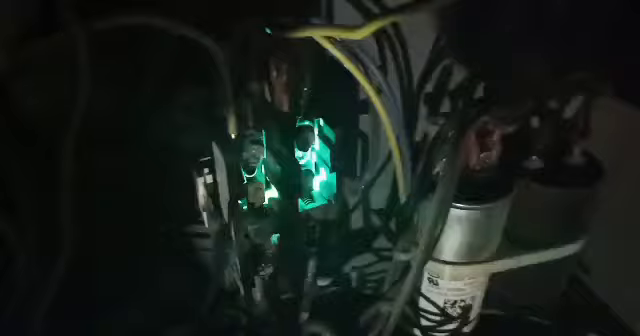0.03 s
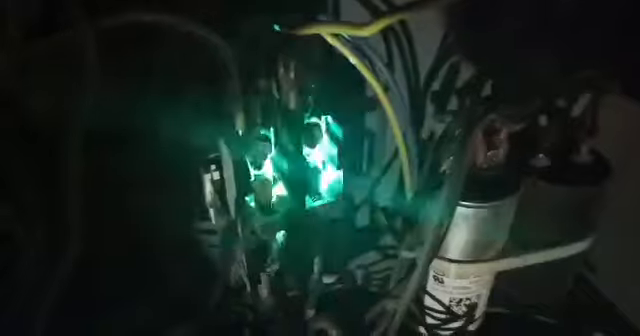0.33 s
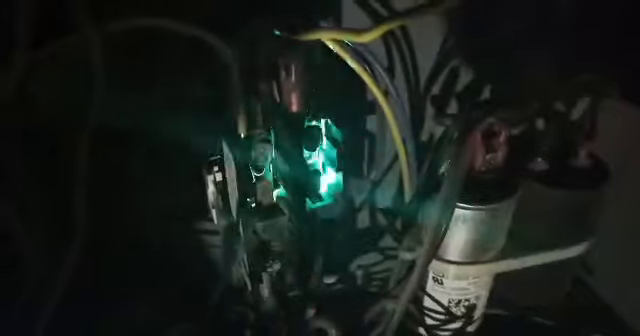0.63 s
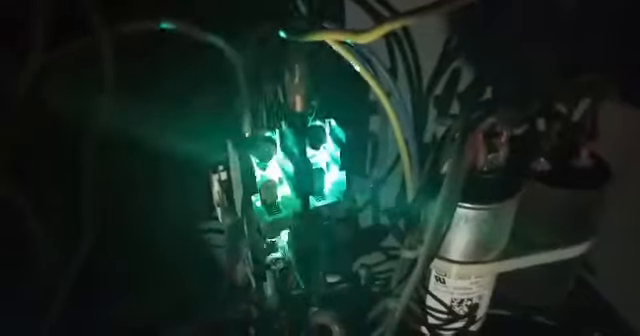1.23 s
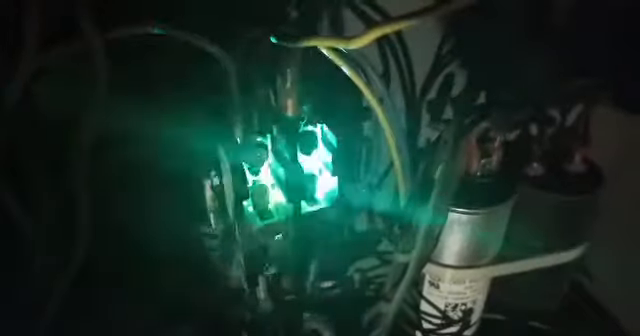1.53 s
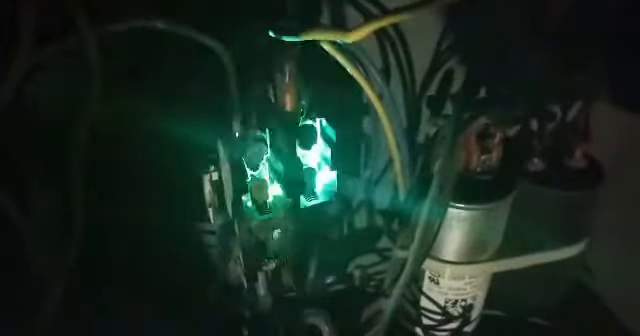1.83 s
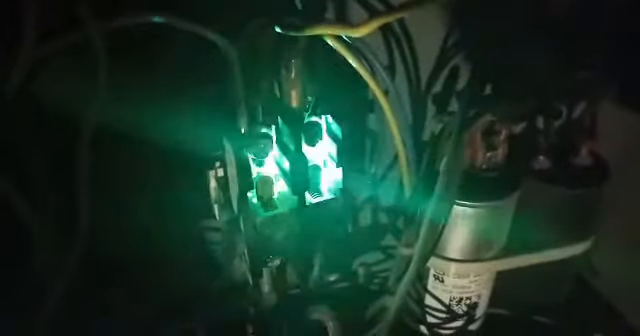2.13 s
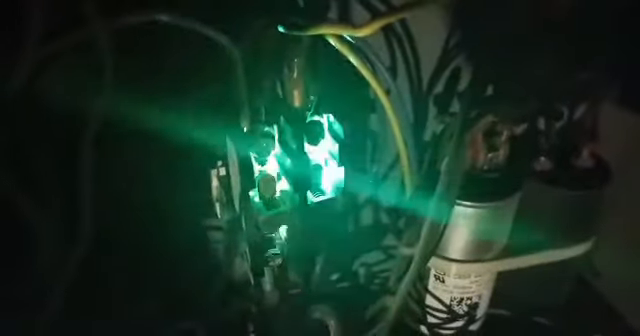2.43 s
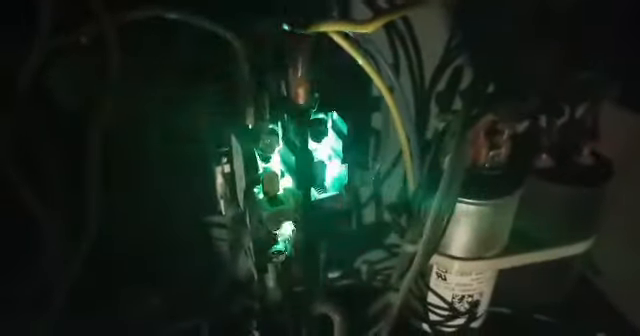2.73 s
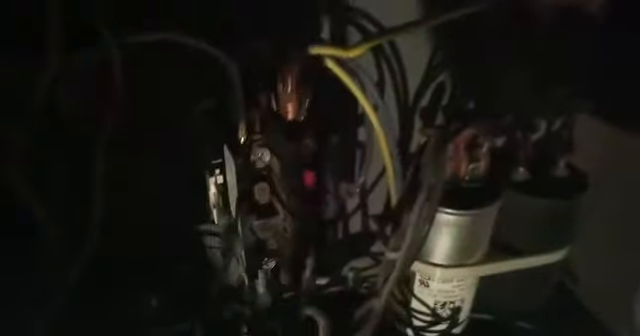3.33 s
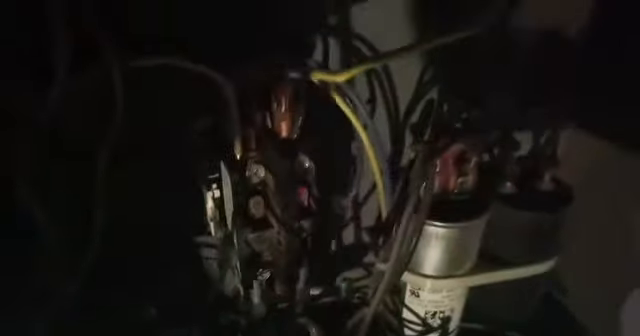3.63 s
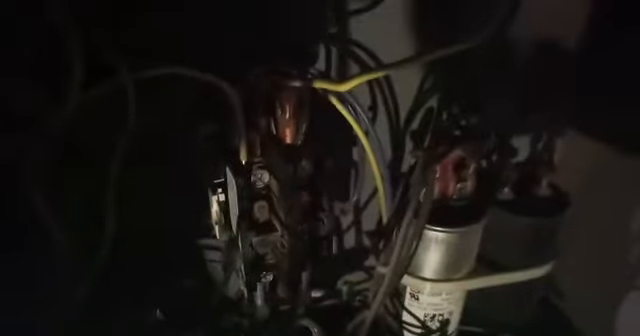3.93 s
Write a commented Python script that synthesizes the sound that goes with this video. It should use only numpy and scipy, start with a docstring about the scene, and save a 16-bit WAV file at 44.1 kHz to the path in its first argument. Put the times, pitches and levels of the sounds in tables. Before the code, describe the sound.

At about 0.3 seconds an electrical contactor abruptly starts arcing close by, a loud, bright, rattling buzz with sizzle and irregular ringing snaps. It surges and sags over a low cabinet growl and compressor hum. Everything cuts out for an instant near 1.25 seconds. Around 3.4 seconds the snaps stop and, after a brief dip, an even buzz continues with the hum until 4 seconds.

```python
"""Arcing contactor, close up

A burnt contactor chatters and arcs in a metal control compartment, close to the microphone.
The contacts spit on every half cycle of the mains: raggedly and with loud ringing snaps while the arc
burns, as an even buzz once it is out. Puffs shake the cabinet and a compressor hums beside it."""
import sys
import numpy as np
from scipy import signal
from scipy.fft import rfft, irfft
from scipy.io import wavfile
from scipy.ndimage import uniform_filter1d

SR = 44100
rng = np.random.default_rng(int(sys.argv[2]) if len(sys.argv) > 2 else 0)


def bounce(signal):
    """Save signal as a 16-bit WAV file at the path given by the first command-line argument."""
    frames = np.transpose(np.atleast_2d(signal))
    limited = np.clip(frames, -1, 1)
    pcm = np.round(limited * 32767).astype(np.int16)
    wavfile.write(sys.argv[1], SR, pcm)


N = 176400
T = np.arange(N) / SR
MAINS_HZ, ARC_OUT_S = 60, 3.37
LOW_RING_HZ, HIGH_RING_HZ = 4820, 6440  # two modes of the contacts

# Strength of the arcing and chatter. Each row: time in seconds, relative level in dB.
FLARE = [(0.27, -1.3), (0.335, 1), (0.365, -4.5), (0.43, 4), (0.48, -3), (0.56, 7.5), (0.67, 3), (0.8, 4.5),
         (0.875, 3.5), (0.955, 4.5), (1.14, -1.9), (1.17, -6.5), (1.205, -0.5), (1.42, 0), (1.445, -2.5),
         (1.53, 2), (1.72, -2), (1.795, 5.5), (1.85, -3), (1.885, 0.9), (2.05, -3.5), (2.11, 3.5),
         (2.295, 2), (2.345, -4.3), (2.405, 1), (2.46, 2.5), (2.5, -7), (2.595, 5.5), (2.65, -6.5),
         (2.725, 2.5), (2.815, -5), (2.89, 3.5), (2.97, -4), (3.01, 0.5), (3.04, -7.5), (3.065, -1.5),
         (3.115, 3.5), (3.14, -4.5), (3.19, 4.5), (3.335, 3.5), (3.37, 1.9), (3.58, 2.5), (3.64, 3.5),
         (3.99, 3)]
# Spectra of the arcing contacts and of the treble fizz. Each row: frequency in Hz, relative level in dB.
ARCING_SPECTRUM = [(2000, -29), (3000, -16.5), (3900, -5), (4700, -5), (5100, -5), (5700, -1), (6600, -4),
                   (7000, -8.5), (7600, -18), (9000, -32)]
FIZZ_SPECTRUM = [(5000, -18), (7500, 2.5), (8200, 1), (8800, -5.5), (9750, 4), (10400, 0.5), (11400, -2.5),
                 (12300, 7.5), (12900, -12), (13500, 2.5), (14200, -4)]


def amp(db):
    """Decibels to gain."""
    return 10 ** (np.asarray(db) / 20)


def unit(x):
    """Scales to rms 1."""
    return x / np.sqrt(np.mean(x ** 2) + 1e-20)


def curve(rows):
    """Each value column of a time table, at every sample."""
    s, *columns = np.transpose(rows)
    return np.squeeze([np.interp(T, s, c) for c in columns])


def add(mix, s, sound):
    """Adds a sound at s seconds."""
    part = mix[round(s * SR):][:len(sound)]
    part += sound[:len(part)]


def colour(x, spectrum, size=8192):
    """Minimum-phase filter with the given spectrum; the result has rms 1."""
    hz, db = np.transpose(spectrum)
    f = abs(np.fft.fftfreq(size, 1 / SR))
    log_gain = np.log(amp(np.interp(np.log(f + 1), np.log(hz), db)))
    taps = np.fft.ifft(np.exp(np.conj(signal.hilbert(log_gain)))).real[:size // 2]
    return unit(signal.oaconvolve(x, taps)[:N])


def wander(hz):
    """Random drift of rms 1, mostly slower than hz."""
    f = np.fft.rfftfreq(N, 1 / SR)
    return unit(irfft(rfft(rng.standard_normal(N)) / (1 + (f / hz) ** 4), N))


def blend(a, b, share):
    """Mixes two sounds by the power share of the first."""
    return np.sqrt(share) * a + np.sqrt(1 - share) * b


def swell(t, rise, fall=None):
    """A rounded swell that peaks at t = 0, symmetric unless a fall is given."""
    return np.exp(-(t / np.where(t < 0, rise, fall or rise)) ** 2)


def resonate(x, hz, width_hz):
    """A resonance that follows the pitch hz, scaled to rms 1."""
    turn = np.exp(2j * np.pi * np.cumsum(hz * np.ones(N)) / SR)
    pole = np.exp(-np.pi * width_hz / SR)
    return unit((turn * signal.lfilter([1 - pole], [1, -pole], x / turn)).real)


def crackle(sparks_per_s=16000):
    """Dense tiny sparks of unequal size."""
    size = amp(3 * np.minimum(rng.exponential(1, N), 4))
    return unit(size * rng.choice([-1., 1.], N) * (rng.random(N) < sparks_per_s / SR))


def rattle(sparks, bursts, arc_out):
    """Bursts ring two contact modes; later, narrow resonances glide in the buzz as the mic moves."""
    # Spectrum of the even buzz. Each row: frequency in Hz, relative level in dB.
    even_spectrum = [(3000, -23.5), (3900, -5.5), (4650, -3.5), (5500, 0.5), (6300, -3.5), (6800, 0),
                     (7150, -10), (9000, -18.5)]
    # Narrow resonances. Each row: first pitch in Hz, final pitch in Hz, relative level in dB.
    glides = [(3860, 4350, -11), (5330, 5080, -14), (6640, 6710, -13)]
    strikes = crackle() * bursts
    arcing = (colour(sparks, ARCING_SPECTRUM)
              + amp(-7) * resonate(strikes, LOW_RING_HZ, width_hz=240)
              + amp(-9) * resonate(strikes, HIGH_RING_HZ, width_hz=320))
    glide_left = np.exp(-np.maximum(T - ARC_OUT_S, 0) / .17)
    resonances = sum(amp(db) * resonate(crackle(), hz + (first_hz - hz) * glide_left, width_hz=80)
                     for first_hz, hz, db in glides)
    return blend(colour(sparks, even_spectrum) + resonances, arcing, arc_out)


def compartment(x, t60_s=.041):
    """Short dense echoes off the metal walls."""
    t = np.arange(SR // 5) / SR
    tail = rng.standard_normal(len(t)) * amp(-60 * t / t60_s) * (t > .001)
    return signal.oaconvolve(x, tail / np.linalg.norm(tail))[:N]


def shudder(width_s=.035):
    """Gain of the low growl, which swells briefly at each surge."""
    # Surges. Each row: time in seconds, boost in dB.
    surges = [(.8, 4.5), (2.31, 3.5), (2.41, 1.5), (3.5, 0), (3.77, 2.5), (3.89, 1)]
    return amp(sum(db * swell(T - s, width_s) for s, db in surges))


def cabinet(cycle, ms, force):
    """A thump and a puff on each half cycle shake the cabinet into a low growl."""
    # Response of the cabinet. Each row: frequency in Hz, relative level in dB.
    spectrum = [(20, -62), (40, -18), (58, -9), (85, -1), (125, 8), (165, 0.5), (205, -3), (260, 0.5),
                (380, -2), (520, -6), (1200, -24), (3000, -58)]
    thumps = unit(np.diff(cycle, prepend=cycle[0]) * force)
    puffs = unit(rng.standard_normal(N) * swell(ms, 3.4))
    return blend(colour(compartment(thumps), spectrum), colour(puffs, spectrum), share=.13) * shudder()


def chatter():
    """One burst of sparks per half cycle rattles the contacts, rasps, fizzes and shakes the cabinet."""
    # Where the burst falls in the half cycle. Each row: time in seconds, lag in milliseconds.
    lag = [(.3, 7.17), (1.22, 6.33), (1.29, 3.76), (2.3, 4.5), (2.7, 5.5), (3.1, 4), (3.42, 4.5), (4, 5.4)]
    # How unequal the bursts are. Each row: time in seconds, spread in dB.
    raggedness = [(.3, 5), (.6, 3.5), (1.05, 3.5), (1.3, 5), (3.2, 5), (3.42, 1.5)]
    # Sizzle between the bursts. Each row: time in seconds, level against a burst in dB.
    sizzle_levels = [(.3, -4.5), (.6, -7), (1.0, -4), (1.3, -2.5), (3.0, -5), (3.25, -1.5), (3.42, -12),
                     (4, -2.5)]
    # Slow balance. Each row: time in seconds, then relative dB of rattle, rasp, fizz and cabinet shake.
    balance = [(.27, -37, -41.5, -45, -33.5), (.55, -35.5, -42.5, -42, -38.5), (.9, -35.5, -41, -46, -38),
               (1.05, -33.5, -39, -39.5, -33.5), (1.4, -39.5, -41, -50, -35), (2.1, -37, -42, -45, -35.5),
               (2.85, -35.5, -42, -46, -34.5), (3.22, -36.5, -41, -41.5, -36),
               (3.45, -31.5, -43, -44.5, -32.5), (3.62, -33.5, -44.5, -42.5, -37.5),
               (4, -36.5, -44, -43.5, -35.5)]
    # Midrange rasp. Each row: frequency in Hz, relative level in dB.
    rasp_spectrum = [(400, -20.5), (700, -2), (930, 0.5), (1070, 6.5), (1220, -0.5), (1420, 1.5),
                     (1700, -4), (1940, 3.5), (2250, -2.5), (2900, 2.5), (3450, 5), (4500, -22.5),
                     (7000, -21.5)]

    rate_hz = 2 * MAINS_HZ
    turns = (T - curve(lag) / 1000) * rate_hz + 1
    cycle = np.round(turns).astype(int)
    ms = (turns - cycle) / rate_hz * 1000  # time from the nearest burst's peak
    spark_chance, thump_chance = rng.standard_normal((cycle.max() + 1, 2))[cycle].T.clip(-2, 1)
    strength = amp(curve(raggedness) * spark_chance)
    bursts = swell(ms, rise=1.5, fall=2.1) * strength
    sizzle = amp(curve(sizzle_levels))
    arc_out = np.clip((T - ARC_OUT_S) / .076, 0, 1)
    # the bounces of one half cycle partly repeat in the next, more so once the arc is out
    bounces = np.interp(ms, np.arange(-200, 200) * 1000 / SR, rng.choice([-1., 1.], 400))
    drive = blend(unit(bounces), crackle(), share=.22 * (.36 + .56 * arc_out))

    rattling = rattle(drive * np.hypot(bursts, sizzle), bursts, arc_out)
    rasp = colour(drive * np.hypot(bursts, amp(.5)), rasp_spectrum)
    spit = swell(ms, 1.7) * strength
    fizz = colour(crackle() * np.hypot(spit, amp(-3.5) * sizzle), FIZZ_SPECTRUM)
    shake = cabinet(cycle, ms, force=1 + .73 * thump_chance)

    rattle_db, rasp_db, fizz_db, shake_db = curve(balance)
    flare_db = curve(FLARE)
    capped_db = np.minimum(flare_db, 6)  # rattle and fizz follow the flare only this far
    contacts = rattling * amp(rattle_db + .88 * capped_db - 1) + fizz * amp(fizz_db + capped_db + .5)
    pause = amp(-16.5 * swell(T - 3.366, .017))  # the contacts rest as the arc dies
    body = rasp * amp(rasp_db + .63) + shake * amp(shake_db - 2.5)
    return contacts * pause + body * amp(flare_db)


def panel():
    """The sheet metal sings on a few multiples of the mains, most strongly when the arc flares."""
    # Panel tones. Each row: multiple of the mains, relative level in dB.
    harmonics = [(12, -60.5), (18, -53.5), (24, -71)]
    # How freely the metal sings. Each row: time in seconds, gain in dB.
    singing = [(.6, -1), (.95, 8), (1.2, -3), (3.0, -5), (3.25, 7.5), (3.4, -9)]
    tones = np.zeros(N)
    for k, db in harmonics:
        level = amp(db) * (1 + .35 * wander(hz=3))
        tones += level * np.sin(2 * np.pi * k * MAINS_HZ * T + 1.54 * wander(hz=2.6))
    return tones * amp(2.1 * curve(FLARE) + curve(singing))


def compressor(shaft_hz=57.75, waver=.41):
    """Wavering multiples of the shaft speed, which surge and sag with the chatter."""
    # Hum. Each row: multiple of the shaft speed, relative level in dB.
    harmonics = [(1, -52), (2, -44), (3, -45), (4, -48.5), (5, -51.5), (6, -44), (7, -52), (8, -50),
                 (10, -56.5)]
    hum = np.zeros(N)
    for k, db in harmonics:
        level = np.sqrt(2) * amp(db) * (1 + waver * wander(hz=4.4))
        phase = 2 * np.pi * (k * shaft_hz * T + rng.random())
        hum += level * np.sin(phase + waver * wander(hz=6.1))
    rise_db = 1.5 * np.clip((T - ARC_OUT_S) / .16, 0, 1)  # a little stronger once the arc is out
    return hum * shudder() * amp(curve(FLARE) + rise_db - 4.5)


def ring(hz, spread_hz):
    """A metallic ring whose pitch differs a little from snap to snap."""
    return np.sqrt(2) * np.sin(2 * np.pi * np.cumsum(hz + spread_hz * wander(hz=337)) / SR)


def snaps(lead_s=.005):
    """Hard strikes of the arc: two short metallic rings, a noisy body and a bright crack."""
    # Strikes. Each row: time in seconds, then relative dB of the lower and the upper ring.
    strikes = [(0.282, -28, -30), (0.2999, -28, -24), (0.3156, -32, -29), (0.3504, -32, -23),
               (0.4427, -31, -28), (0.4606, -31, -25), (0.5075, -30, -34), (0.541, -26, -30),
               (0.6085, -29, -29), (0.64, -27, -27), (0.676, -30, -25), (0.7328, -29, -26),
               (0.774, -27, -31), (0.8243, -28, -32), (0.8497, -28, -31), (0.9985, -27, -30),
               (1.0657, -28, -31), (1.0986, -28, -32), (1.1236, -35, -29), (1.15, -31, -32),
               (1.1694, -38, -27), (1.2109, -36, -25), (1.2846, -33, -20), (1.2963, -29, -29),
               (1.3125, -26, -32), (1.337, -23, -29), (1.3541, -27, -30), (1.3718, -28, -26),
               (1.3895, -31, -26), (1.4043, -28, -31), (1.421, -27, -31), (1.4394, -33, -25),
               (1.4539, -30, -35), (1.4716, -33, -29), (1.4902, -35, -30), (1.5126, -28, -31),
               (1.5298, -24, -27), (1.5455, -28, -31), (1.57, -24, -27), (1.5899, -38, -23),
               (1.604, -27, -30), (1.6824, -27, -34), (1.7139, -30, -27), (1.7466, -30, -29),
               (1.7995, -29, -24), (1.821, -27, -32), (1.8409, -34, -27), (1.871, -29, -31),
               (1.8889, -26, -25), (1.9224, -31, -27), (2.0066, -29, -33), (2.0291, -27, -34),
               (2.0479, -34, -25), (2.0812, -31, -22), (2.129, -27, -30), (2.1454, -27, -32),
               (2.1628, -28, -31), (2.1788, -27, -31), (2.2204, -33, -28), (2.2593, -32, -24),
               (2.2722, -30, -29), (2.305, -33, -27), (2.3392, -31, -23), (2.4039, -35, -27),
               (2.4208, -25, -29), (2.44, -34, -22), (2.4633, -26, -27), (2.5064, -32, -25),
               (2.5793, -27, -30), (2.5956, -30, -26), (2.6156, -34, -23), (2.6314, -33, -25),
               (2.6491, -31, -19), (2.7208, -29, -32), (2.7459, -23, -31), (2.7875, -25, -30),
               (2.8063, -36, -20), (2.863, -21, -32), (2.8876, -24, -29), (2.9127, -25, -26),
               (2.9572, -34, -27), (3.0259, -30, -19), (3.0799, -30, -27), (3.1126, -30, -30),
               (3.1795, -27, -30), (3.2039, -28, -26), (3.2624, -28, -25), (3.2878, -20, -29),
               (3.3053, -24, -29), (3.3286, -33, -28), (3.3458, -23, -27)]
    t = np.arange(-lead_s, 4 * lead_s, 1 / SR)
    tail = (t > 0) * amp(1) * np.exp(-t / .0032)
    envelope = np.maximum(swell(t, .0014), tail)
    low, high, crack = np.zeros((3, N))
    for s, low_db, high_db in strikes:
        add(low, s - lead_s, amp(low_db) * envelope)
        add(high, s - lead_s, amp(high_db) * envelope)
        add(crack, s - lead_s, np.hypot(amp(low_db), amp(high_db)) * swell(t, .0052))
    rings = low * ring(LOW_RING_HZ, spread_hz=125) + high * ring(HIGH_RING_HZ, spread_hz=190)
    body = np.hypot(low, high) * colour(crackle(), ARCING_SPECTRUM)
    crack *= colour(crackle(), FIZZ_SPECTRUM)
    softening = amp(-.5 * np.maximum(curve(FLARE), 0))  # snaps soften as the arc becomes continuous
    return (amp(-2) * rings + amp(-6.5) * body + amp(-17) * crack) * softening


def scene():
    """Contactor, compartment echoes, singing panel and compressor at one close microphone."""
    buzz, hits = chatter(), snaps()
    echoes = amp(-16.5) * compartment(buzz) + amp(-20) * compartment(hits)
    return (buzz + hits + echoes + panel() + compressor())[None]


def record(dry, ceiling=.26, top_hz=13850):
    """The sound starts abruptly and cuts out once for an instant; peaks are rounded, top treble cut."""
    onset = np.clip((T - .261) / .009, 0, 1)
    gap = np.where((T > 1.2335) & (T < 1.2798), amp(-41.5), 1)
    gate = uniform_filter1d(onset * gap, size=30)
    rounded = ceiling * np.tanh(dry / ceiling)
    lowpass = signal.firwin(255, top_hz, window=("kaiser", 9), fs=SR)
    return signal.oaconvolve(rounded * gate, lowpass[None], "same")


dry = scene()
out = record(dry)
bounce(out)
```